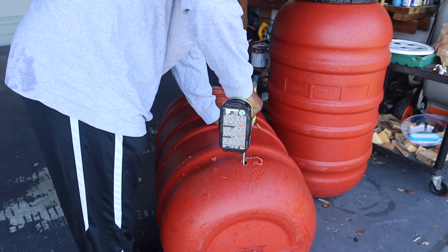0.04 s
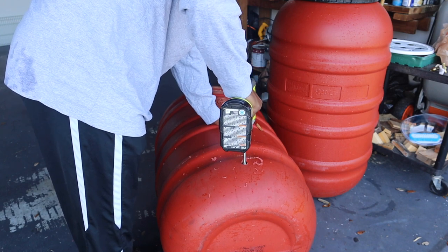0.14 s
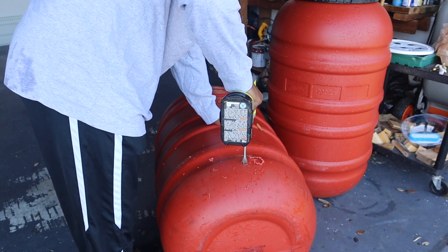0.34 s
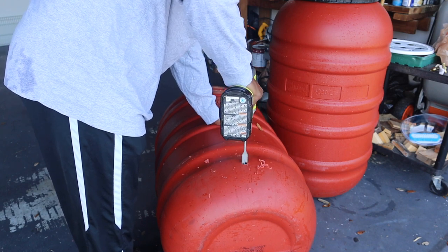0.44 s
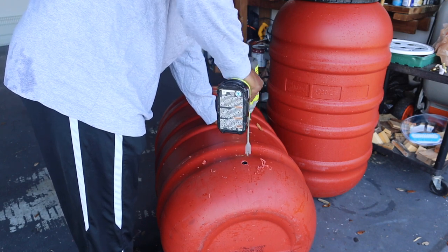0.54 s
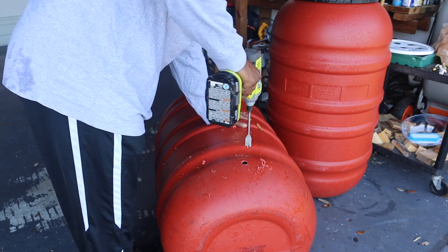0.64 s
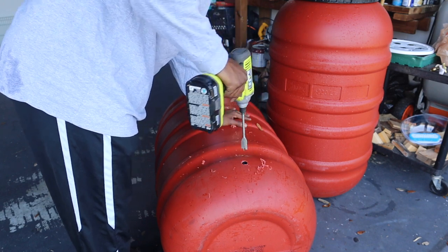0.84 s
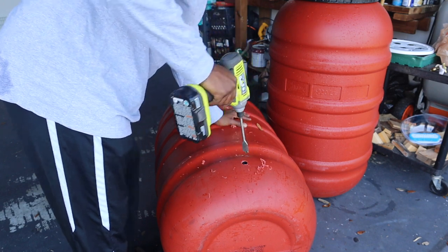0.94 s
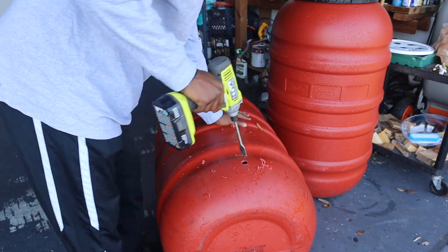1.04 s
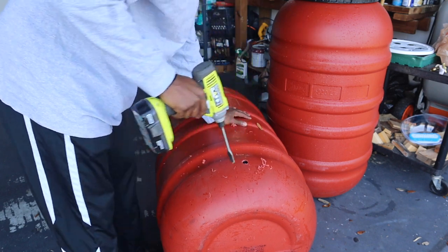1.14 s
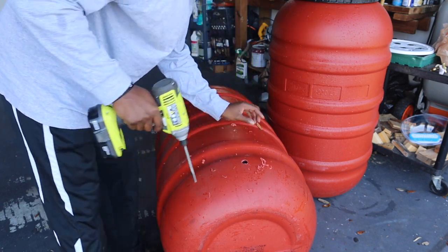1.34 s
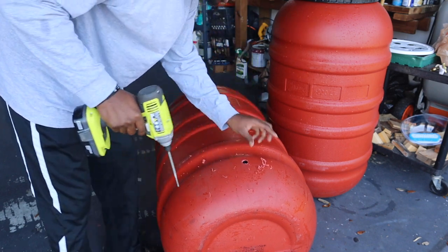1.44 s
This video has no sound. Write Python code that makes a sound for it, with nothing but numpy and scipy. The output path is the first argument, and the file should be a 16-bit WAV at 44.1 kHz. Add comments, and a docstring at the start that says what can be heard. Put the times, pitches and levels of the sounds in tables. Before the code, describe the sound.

A cordless drill grinds loudly through a hollow plastic barrel, stops, then light knocks and rubbing follow.

```python
"""An earlier burst dies away under soft air noise as a cordless drill starts: its shaft tone climbs, parts clack.
Its spade bit chatters through the wall of an empty plastic barrel: random clicks excite wall and air modes,
a drone wanders, the blade catches, rasp noise rings the steel. The steel squeals and the drill stops.
The barrel air hums on as a narrow resonance; chips tap the wall as short tones with cracks of noise.
A hand scuffs, thumps and wipes the plastic with shaped friction noise. An open garage answers throughout."""
import sys
import numpy as np
from scipy import signal
from scipy.fft import rfft, irfft
from scipy.io import wavfile
from scipy.ndimage import uniform_filter1d

SR = 44100
rng = np.random.default_rng(int(sys.argv[2]) if len(sys.argv) > 2 else 0)


def transcribe(u):
    """Save the signal u as a 16-bit wav file named by the first command-line argument.

    u: samples, shape (n,) or (channels, n), limited to [-1, 1]; the rate is SR.
    q: integer samples, one column per channel.
    """
    v = np.clip(np.atleast_2d(u).T, -1, 1)
    q = np.round(v * 32767).astype(np.int16)
    wavfile.write(sys.argv[1], SR, q)


N = 66150
T = np.arange(N) / SR
BARREL_LOW_HZ = 106
SNAP, SNAP_S = 0.53, 0.00092  # extra gain on an attack, and its time constant

# Bending modes of the barrel wall: (frequency [Hz], bandwidth [Hz], level [dB])
WALL_MODES = [(509.7, 10, -7.5), (563, 29, -6), (636, 32, -5.5), (754, 38.4, 0), (848, 45, -1.5),
              (924, 53, -3), (1014, 46, -2), (1083, 21, -5), (1198, 140, -3.5), (1358, 55, -5.5),
              (1486, 170, -9), (1993, 100, -11), (2094, 110, -13.5), (2538, 84, -14)]
# Modes of the barrel boom: (frequency [Hz], bandwidth [Hz], level [dB])
BOOM_MODES = [(126, 51, -20.5), (187.3, 9.6, -16), (229.8, 30, -11), (285, 44, -6.5), (316.7, 24, -7),
              (369, 22.5, -2.5), (391.3, 18.5, -3.5), (455.3, 44, -7.5)]
# Spectrum of the cutting rasp: (frequency [Hz], relative density [dB per Hz])
RASP_SPECTRUM = [(710, -63), (1200, -11), (1730, -12), (2790, -12.5), (4800, -17.5), (5900, -20.5),
                 (8820, -17.5), (11200, -27), (13600, -26.5), (16000, -38)]
# Resonances of bit and gears: (frequency [Hz], bandwidth [Hz], level [dB])
STEEL_MODES = [(4600, 1800, -1), (10600, 50, -8.5), (13700, 1600, -13)]


def amp(db):
    """Level to amplitude: 20 dB is a factor of ten."""
    return 10 ** (np.asarray(db) / 20)


def evened(x):
    """Normalization to unit rms."""
    return x / np.sqrt(np.mean(x ** 2) + 1e-20)


def read(points, hz):
    """Interpolation of a curve along logarithmic frequency."""
    f, value = np.transpose(points)
    return np.interp(np.log(hz + 1), np.log(f + 1), value)


def level(table, axis):
    """Amplitude envelope: gain from one dB column, -120 dB outside the curve."""
    rows = np.array(table)
    return amp(np.interp(T, rows[:, 0], rows[:, axis], -120, -120))


def add(mix, s, sound):
    """Superposition: adds a sound from time s on, cut at the end of the mix."""
    part = mix[round(s * SR):][:len(sound)]
    part += sound[:len(part)]


def colour(x, spectrum):
    """Spectral shaping: weights each frequency of x, rms 1."""
    weight = amp(read(spectrum, np.fft.rfftfreq(N, 1 / SR)))
    return evened(irfft(rfft(x) * weight, N))


def ring(x, modes):
    """Modal superposition: two-pole resonances of alternating sign, rms 1."""
    total = 0
    for k, (hz, width, db) in enumerate(modes):
        mode = signal.lfilter(*signal.iirpeak(hz, hz / width, SR), x)
        # the root evens out the noise power that bands of different width pass
        total = total + (-1) ** k * amp(db) * mode / np.sqrt(width)
    return evened(total)


def tone(hz):
    """Phase is the integral of frequency: a sine of varying pitch, rms 1."""
    return np.sqrt(2) * np.sin(2 * np.pi * np.cumsum(hz) / SR)


def grit(per_s, spread_db):
    """Shot noise: random clicks of either sign, a few of them large."""
    size = amp(spread_db * np.minimum(rng.exponential(1, N), 4))
    sign = rng.choice([-1, 1], N)
    return evened(size * sign * (rng.random(N) < per_s / SR))


def knock(db, hz, t60, bright_db):
    """Impact response: a damped tone with a crack of noise on its front."""
    t = T[:3000]
    crack_t60 = 0.033  # s
    band = signal.butter(2, (900, 2520), "band", fs=SR)
    crack = evened(signal.lfilter(*band, rng.standard_normal(len(t))))
    crack *= amp(bright_db - 60 * t / crack_t60) * (1 + SNAP * np.exp(-t / SNAP_S))
    attack = np.minimum(t / 0.00096, 1)
    body = attack * amp(-60 * t / t60) * np.sin(2 * np.pi * hz * t)
    return amp(db) * (body + crack)


def air():
    """Stationary broadband noise: steady air under the scene."""
    # Spectrum of the air: (frequency [Hz], relative density [dB per Hz])
    air_spectrum = [(15, -43), (25, -19), (92, 4), (503, -6.5), (1290, -9.5), (2000, -14), (2160, -20),
                    (6920, -28.5), (16000, -35)]
    return amp(-51.5) * colour(rng.standard_normal(N), air_spectrum)


def earlier_burst():
    """Exponential decay: noise of an earlier burst falls by a constant number of dB per second."""
    # Spectrum of the burst: (frequency [Hz], relative density [dB per Hz])
    burst_spectrum = [(150, -12), (455, -2.5), (856, -30), (1390, -10), (1990, -25), (4920, -22),
                      (12000, -38.5), (15600, -66)]
    start_db, slope_db_per_s = -46.5, -130
    return amp(start_db + slope_db_per_s * T) * colour(rng.standard_normal(N), burst_spectrum)


def garage(x):
    """Reverberation: convolution with a noise tail whose bands decay at their own rates."""
    # Decay of the open garage: (frequency [Hz], reverberation time T60 [s])
    decay = [(200, 0.67), (400, 0.74), (1000, 0.69), (4000, 0.59), (12000, 0.31)]
    hz, t, z = signal.stft(rng.standard_normal(SR), SR, nperseg=256)
    tail = signal.istft(z * amp(-60 * t / read(decay, hz)[:, None]), SR, nperseg=256)[1]
    tail = np.concatenate([np.zeros(300), tail])  # delay in samples
    return signal.fftconvolve(x, tail / np.linalg.norm(tail))[:N]


def rubbing():
    """Friction as shot noise: dense small slips over a continuous hiss."""
    return grit(6000, 3.1) + 0.97 * rng.standard_normal(N)


def scuffs():
    """Dry friction: brief finger strokes mix dull rubbing with a thin resonant squeak."""
    # Strokes: (start [s], length [s], level [dB], share of thin squeak [0-1])
    strokes = [(1.027, 0.053, -52, 0.2), (1.123, 0.034, -43.5, 0.11), (1.254, 0.022, -51.5, 0.3),
               (1.272, 0.053, -45, 0.26)]
    # Spectrum of dull rubbing: (frequency [Hz], relative density [dB per Hz])
    dull_spectrum = [(470, -27), (800, -0.5), (2070, -6.5), (3880, -4.5), (6740, -7.5), (8230, -10.5),
                     (16000, -27)]
    # Resonance of the thin squeak: (frequency [Hz], bandwidth [Hz], level [dB])
    squeak_mode = [(8260, 620, 0)]
    rise_s, fade_db = 0.003, -11.5
    rub, out = rubbing(), np.zeros(N)
    dull, thin = colour(rub, dull_spectrum), ring(rub, squeak_mode)
    for s, length, db, share in strokes:
        t = np.arange(0, length, 1 / SR)
        stroke = np.minimum(t / rise_s, 1) * amp(db + fade_db * (t / length) ** 2)
        mixed = (1 - share) * dull + share * thin
        add(out, s, stroke * mixed[round(s * SR):][:len(t)])
    return out


def thump():
    """Forced response: a swelling push shakes wall and boom modes, then a low tone decays."""
    peak_s, rise_s = 1.3, 0.068
    peak_db, slope_db_per_s = -40, -250
    rub = rubbing()
    swell = np.clip(1 + (T - peak_s) / rise_s, 0, 1) ** 2
    push = swell * amp(peak_db + slope_db_per_s * np.maximum(T - peak_s, 0))
    out = push * (ring(rub, WALL_MODES) + amp(-3) * ring(rub, BOOM_MODES))
    add(out, peak_s, knock(-34, hz=230, t60=0.13, bright_db=-40))
    return out


def wipe():
    """Friction-driven resonance: grainy rubbing, its narrow bands gaining on the rest."""
    # Strength of the wipe: (time [s], level before the closing factor [dB])
    wiping = [(1.33, -58), (1.36, -50), (1.4, -42), (1.446, -36.5), (1.48, -32.5), (1.5, -37)]
    # Spectrum of the wipe: (frequency [Hz], relative density [dB per Hz])
    wipe_spectrum = [(180, -38), (300, -11), (774, -8.5), (2880, -8), (3460, -13.5), (5610, -10.5),
                     (6400, -11.5), (7570, -8), (13800, -24), (16000, -27)]
    # Bands that the wipe brings out: (frequency [Hz], bandwidth [Hz], level [dB])
    ribs = [(1150, 330, -2), (2085, 120, 1), (2850, 160, 2), (3840, 146, 1), (4770, 200, 2), (5700, 150, 9)]
    end_db, slope_db_per_s = 1, 60
    grain = rubbing() + grit(1500, 2.9)
    rib_gain = amp(end_db + slope_db_per_s * (T - T[-1]))
    return level(wiping, axis=1) * (colour(grain, wipe_spectrum) + rib_gain * ring(grain, ribs)) / np.sqrt(2)


def taps():
    """Impulse excitation: chips and taps knock briefly and set the barrel modes ringing."""
    # Taps: (time [s], level [dB], pitch [Hz], crack re tone [dB], barrel ring re tone [dB])
    strikes = [(.8478, -22, 1050, -26, -9), (0.8995, -27, 1190, -9, -10), (0.952, -32, 1180, -10, -7),
               (.978, -42, 980, -4, 1), (1.019, -43, 2380, -1, -5), (1.061, -36, 845, -7, -5),
               (1.2965, -30, 1100, -14, -6)]
    out = np.zeros(N)
    impulse = 1. * (np.arange(4000) == 0)
    blow = ring(impulse, WALL_MODES + BOOM_MODES[-3:])
    blow /= abs(blow).max()
    for s, db, hz, bright_db, ring_db in strikes:
        add(out, s, knock(db, hz, 0.012, bright_db))
        add(out, s, amp(db + ring_db) * blow)
    return out


def hum():
    """Cavity resonance: the barrel air holds a pure tone with a narrow band of noise around it."""
    # Strength of the hum: (time [s], level [dB])
    humming = [(.6, -47), (.66, -38.5), (.77, -50), (.82, -96), (.87, -59), (.99, -47), (1.09, -59),
               (1.16, -82)]
    hum_hz, width_hz = 196, 4.14
    fuzz = ring(rng.standard_normal(N), [(hum_hz, width_hz, 0)])
    return level(humming, axis=1) * (tone(np.full(N, hum_hz)) + 0.1253 * fuzz)


def squeals():
    """Narrow-band resonance: steel squeals in short swells as the bit runs free."""
    # Squeals: (start [s], length [s], peak level [dB], pitch [Hz])
    cries = [(.548, .03, -34, 10100), (.546, .028, -38, 13500), (.61, .028, -34, 3250),
             (.595, .04, -37, 5600), (.644, .032, -32, 4900)]
    out, noise = np.zeros(N), rng.standard_normal(N)
    for s, length, db, hz in cries:
        swell = np.sin(np.pi * np.arange(0, length, 1 / SR) / length)
        squeal = ring(noise, [(hz, 160, 0)])
        add(out, s, amp(db) * swell * squeal[round(s * SR):][:len(swell)])
    return out


def clacks():
    """Damped modal noise: trigger and clutch clack in the steel, each with its own strongest ring."""
    # Clacks: (time [s], level before a common cut [dB], strongest ring [Hz], weight of that ring [1])
    snaps = [(0.164, -35, 4640, 2.2), (0.188, -7.5, 9600, 0.32), (0.378, -15, 7800, 0.67),
             (0.409, -21, 8660, 0.62), (0.477, -9, 13700, 0.22), (0.525, -11.5, 13500, 0.61)]
    common_db, t60, width_hz = -10, 0.032, 350
    out, noise, t = np.zeros(N), rng.standard_normal(N), T[:3000]
    steel = evened(ring(noise, STEEL_MODES) + 1.34 * colour(noise, RASP_SPECTRUM))
    for s, db, hz, weight in snaps:
        clack = steel + weight * ring(noise, [(hz, width_hz, 0)])
        decay = amp(db + common_db - 60 * t / t60) * (1 + SNAP * np.exp(-t / SNAP_S))
        add(out, s, decay * clack[round(s * SR):][:3000])
    return out


def shaft():
    """Rotation sounds at its own rate: the tone climbs with the motor speed and wobbles a little."""
    # Motor shaft: (time [s], mean pitch [Hz], level [dB])
    spin = [(0.192, 120.5, -48), (0.22, 170, -27.5), (0.261, 192.2, -27.5), (0.301, 225, -53),
            (0.338, 266.7, -38), (0.461, 324.2, -39), (0.582, 368.2, -32), (0.659, 355.6, -37),
            (.7, 343, -78)]
    time, pitch, _ = np.transpose(spin)
    wobble = evened(uniform_filter1d(rng.standard_normal(N), size=600))
    return level(spin, axis=2) * tone(np.interp(T, time, pitch) * (1 + 0.007 * wobble))


def drone():
    """A driven mode: the strongest boom holds a wandering note under the heaviest cut."""
    # Boom note: (time [s], level [dB], pitch [Hz])
    note = [(.29, -37, 345), (.325, -15, 336), (.355, -23, 324), (.385, -19, 330), (.42, -33, 335),
            (.465, -19.5, 325), (.5, -23, 345), (.52, -35, 350)]
    time, _, pitch = np.transpose(note)
    return level(note, axis=1) * tone(np.interp(T, time, pitch))


def catches():
    """Stick and release: hard catches of the blade ring as damped tones."""
    # Catches: (time [s], level before a common cut [dB], pitch [Hz])
    bites = [(0.212, -7.5, 724), (0.233, 3, 1100), (.241, -11.5, 813), (0.249, -3, 1023), (.257, -5.5, 900),
             (0.263, 7, 1184), (0.2912, 1.5, 1126), (.296, 4, 779), (.303, 3.5, 854), (0.309, 3, 1098),
             (.319, 2, 789), (0.327, 0, 850), (0.336, 1.5, 900), (0.3827, 1, 1004), (0.411, -5.5, 925),
             (.427, -1.5, 910), (.445, -6, 880), (0.464, -9, 820), (0.488, -2, 1043), (0.503, -3, 830),
             (.515, -9.5, 780)]
    out = np.zeros(N)
    for s, db, hz in bites:
        add(out, s, knock(db - 5.5, hz, t60=0.029, bright_db=-25.5))
    return out


def cutting():
    """Impulsive forcing: blade chatter shakes barrel wall and air; cutting rasps and rings the steel."""
    # Bite of the bit: (time [s], wall level [dB], boom level [dB], rasp level [dB])
    bite = [(.15, -69, -72, -71), (.164, -47, -61, -41), (.183, -39, -51, -37), (.188, -34.5, -42, -32.5),
            (.21, -20.5, -26, -24.5), (.25, -13, -16, -22.5), (.266, -10.5, -25.5, -26),
            (.278, -28.5, -20, -32.5), (.298, -9.5, -17.5, -19.5), (.33, -9, -20, -23.5),
            (.346, -33.5, -23, -23), (.368, -18.5, -19.5, -36), (.382, -22, -25.5, -22),
            (.4, -16, -22.5, -36), (.41, -26, -23.5, -28), (.434, -17.5, -22.5, -22),
            (.458, -20.5, -19.5, -23.5), (.47, -17.5, -23.5, -30), (.48, -22, -25, -23.5),
            (.508, -16, -23.5, -24.5), (.53, -22, -31, -31.5), (.542, -38, -44, -38.5),
            (.562, -32, -20.5, -26), (.574, -25.5, -25.5, -30), (.628, -26.5, -28, -27),
            (.666, -35, -33.5, -30), (.685, -37, -37, -40.5), (.72, -38.5, -49, -45)]
    chatter = grit(per_s=900, spread_db=4)
    chatter = signal.lfilter(*signal.butter(4, BARREL_LOW_HZ, "high", fs=SR), chatter)
    wall = ring(chatter, WALL_MODES)
    # steady noise smooths the clicks in the boom
    boom = ring(evened(chatter) + 0.78 * rng.standard_normal(N), BOOM_MODES)
    teeth = grit(per_s=5000, spread_db=4) + 0.62 * rng.standard_normal(N) + 0.59 * chatter
    rasp = evened(colour(teeth, RASP_SPECTRUM) + amp(-13) * ring(teeth, STEEL_MODES))
    return level(bite, axis=1) * wall + level(bite, axis=2) * boom + level(bite, axis=3) * rasp


def scene():
    """Superposition: near sources, their reverberation and the background noise."""
    hand = scuffs() + thump() + wipe()
    barrel = taps() + hum()
    drill = squeals() + clacks() + shaft() + drone() + catches() + cutting()
    near = hand + barrel + drill
    near = signal.lfilter(*signal.butter(2, BARREL_LOW_HZ / 2, "high", fs=SR), near)
    return (near + amp(-10.5) * garage(near) + air() + earlier_burst())[None]


def record(dry):
    """Saturation and band limiting: peaks are squeezed under a ceiling, then the top is cut."""
    ceiling, edge_hz = 1.02, 15900
    held = dry / (1 + abs(dry / ceiling) ** 8) ** .125
    lowpass = signal.firwin(511, edge_hz, window=("kaiser", 9), fs=SR)
    return signal.oaconvolve(held, lowpass[None], "same")


dry = scene()
out = record(dry)
transcribe(out)
```